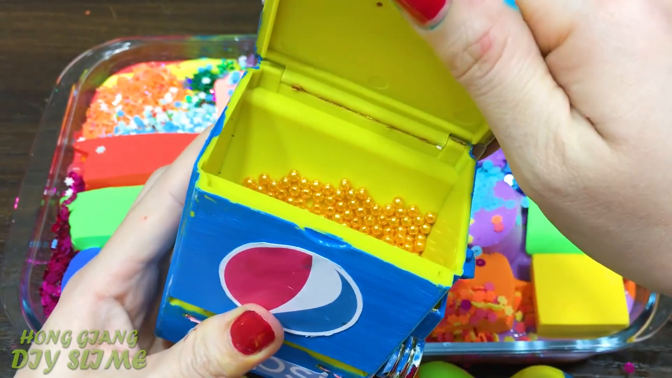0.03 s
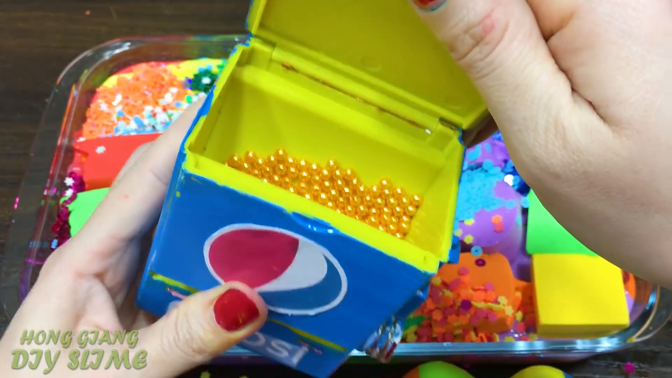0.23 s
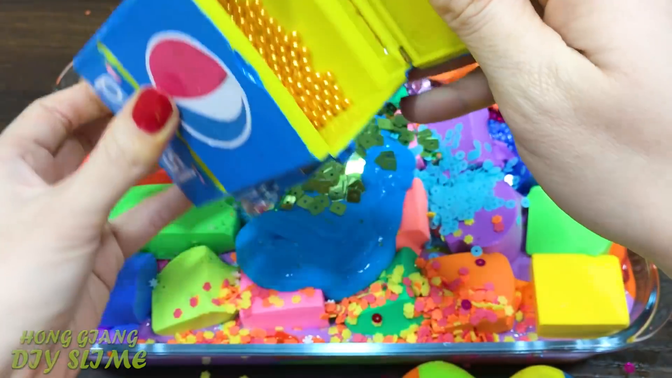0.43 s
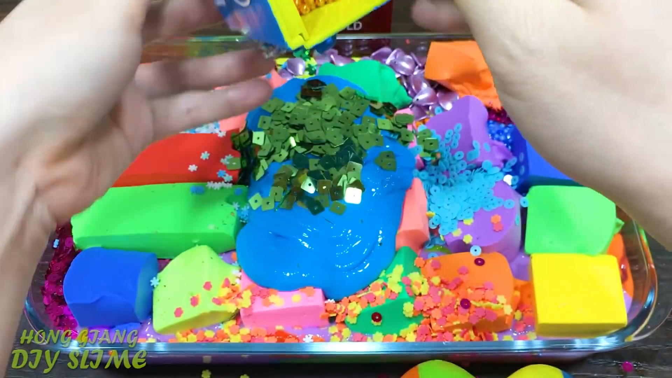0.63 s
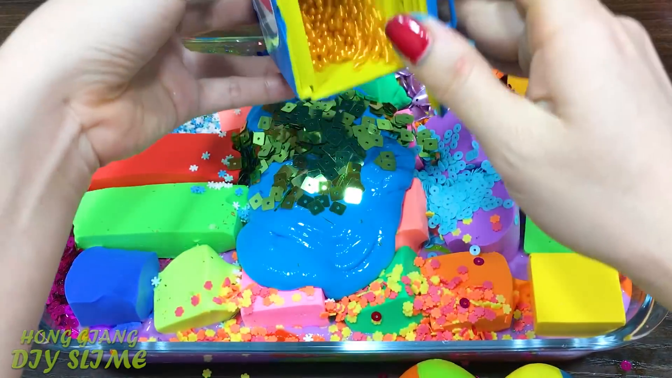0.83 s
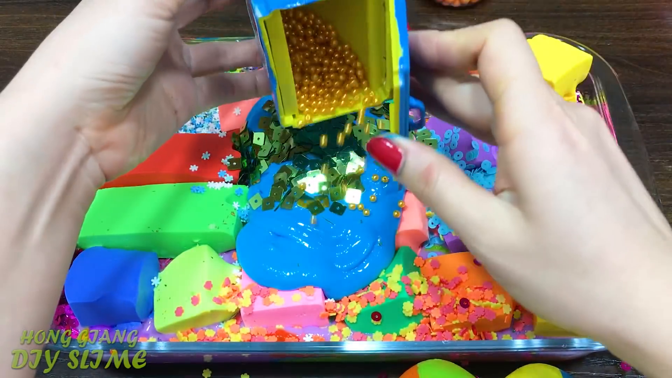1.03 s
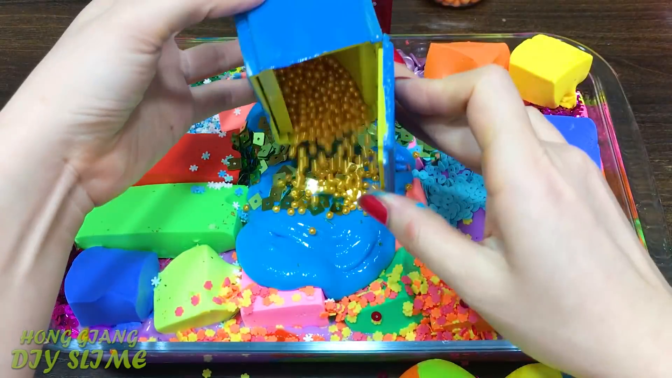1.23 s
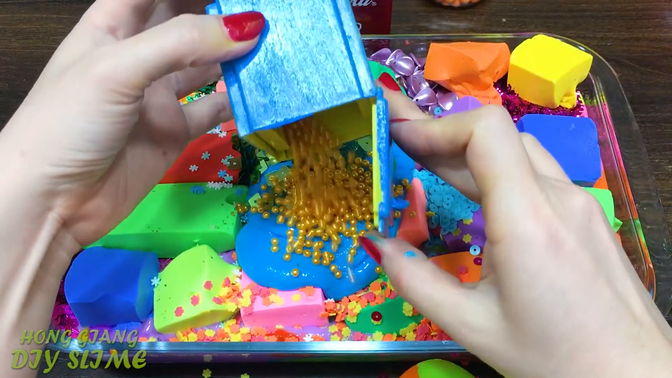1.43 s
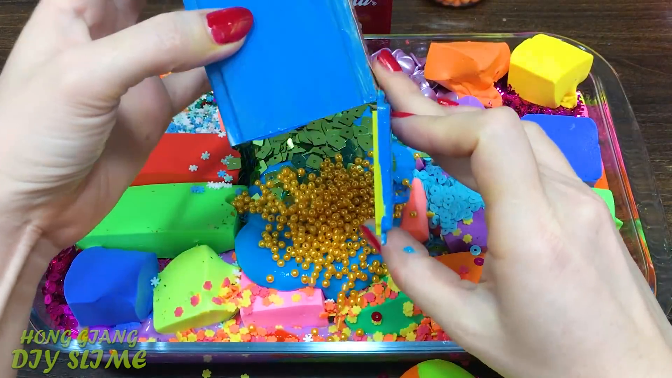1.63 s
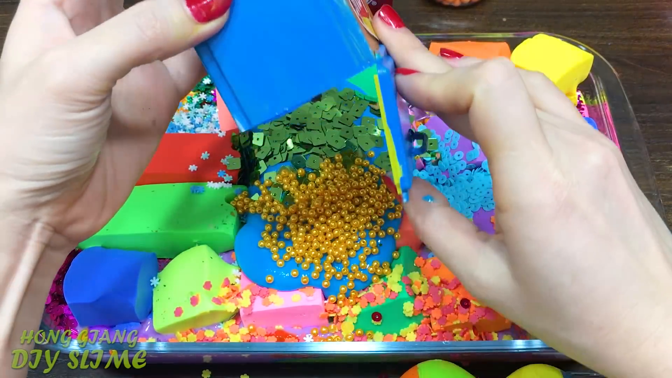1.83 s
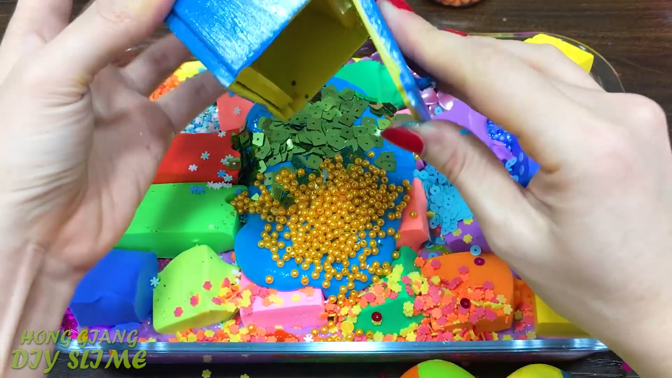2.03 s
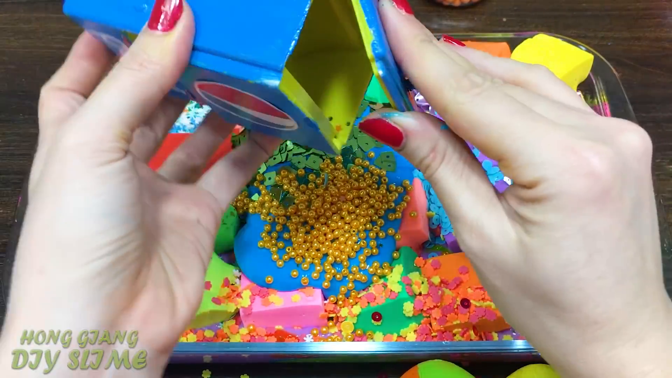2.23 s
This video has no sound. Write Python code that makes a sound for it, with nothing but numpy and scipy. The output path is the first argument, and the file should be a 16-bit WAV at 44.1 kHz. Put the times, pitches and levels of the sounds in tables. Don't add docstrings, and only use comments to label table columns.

```python
import sys
import numpy as np
from scipy import signal
from scipy.fft import rfft, irfft
from scipy.io import wavfile
from scipy.ndimage import uniform_filter1d

SR = 44100
rng = np.random.default_rng(int(sys.argv[2]) if len(sys.argv) > 2 else 0)


def invert_db(x):
    u = np.asarray(x, float) / 20
    return 10 ** u


def digitize_waveform(pressure):
    field = np.atleast_2d(pressure).T
    bounded = np.clip(field, -1, 1)
    quanta = np.round(bounded * 32767).astype(np.int16)
    wavfile.write(sys.argv[1], SR, quanta)


N = 101430


def evened(x):
    return x / np.sqrt(np.mean(x ** 2) + 1e-20)


def coloured(x, points):
    f, db = np.transpose(points)
    hz = np.fft.rfftfreq(len(x), 1 / SR)
    return irfft(rfft(x) * invert_db(np.interp(np.log(hz + 1), np.log(f), db)), len(x))


def highpassed(x, hz):
    return signal.sosfilt(signal.butter(4, hz, "high", fs=SR, output="sos"), x)


def ramp(t, start_s, end_s):
    return np.clip((t - start_s) / (end_s - start_s), 0, 1)


def drift(size):
    return evened(uniform_filter1d(uniform_filter1d(rng.standard_normal(N), size), size))


def add(mix, s, sound):
    part = mix[round(s * SR):][:len(sound)]
    part += sound[:len(part)]


def resonate(x, peaks):
    out = np.zeros(len(x))
    for hz, width, db in peaks:
        r = np.exp(-np.pi * width / SR)
        out += invert_db(db) * signal.lfilter([1 - r, 0, r - 1], [1, -2 * r * np.cos(2 * np.pi * hz / SR), r * r], x)
    return out


def ring(modes, rise=.01, size=4000):
    t = np.arange(size) / SR
    x = np.zeros(size)
    for hz, t60, db in modes:
        build = (1 - np.exp(-t * hz / rise)) ** 2
        x += build * invert_db(db - 60 * t / t60) * np.sin(2 * np.pi * hz * t)
    return x / abs(x).max()


def pops(events, modes, rise):
    out = np.zeros(N)
    for s, db in events:
        add(out, s, -invert_db(db) * ring(modes, rise))
    return out


def puff(colour, t60_s, rise_s):
    t = np.arange(900) / SR
    x = coloured(rng.standard_normal(900), colour) * invert_db(-60 * t / t60_s) * np.minimum(t / rise_s, 1)
    return x / abs(x).max()


def grains(rate_per_s, count=40):
    size_db, t60_s, top_hz = 3.4, .005, 16500
    u, kind, t = rng.random(N), rng.integers(0, count, N), np.arange(400) / SR
    struck = u < rate_per_s / SR
    size = invert_db(size_db * np.minimum(rng.exponential(1, N), 4.5)) * struck / np.sqrt(rate_per_s)
    shape, out = rng.random((count, 10, 2)), np.zeros(N)
    for k in range(count):
        hz, phase = top_hz * shape[k, :, :1], shape[k, :, 1:]
        tap = np.sin(2 * np.pi * (hz * t + phase)).sum(0)
        out += signal.oaconvolve(size * (kind == k), tap * invert_db(-60 * t / t60_s))[:N]
    return evened(out)


# (frequency [Hz], level [dB])
AIR_COLOUR = [(20, -33), (45, -11), (65, -8.5), (105, -2), (170, -6), (300, -9.5), (800, -18.5),
              (16000, -31)]


def air():
    air_db, hum_db, rumble_db, lump_db = -64, -72.5, -70.5, 0.5
    hum = resonate(rng.standard_normal(N), [(203.5, 8, 0)])
    low = [(70, 18, 0)]
    lumps = drift(4000)
    rumble = evened(invert_db(lump_db * lumps) * resonate(resonate(rng.standard_normal(N), low), low))
    tone = evened(coloured(rng.standard_normal(N), AIR_COLOUR))
    return invert_db(air_db) * tone + invert_db(hum_db) * evened(hum) + invert_db(rumble_db) * rumble


def room(x):
    low_t60_s, top_t60_s, spacing = 0.2, .13, 20
    t, taps = np.arange(SR // 2) / SR, np.zeros(SR // 2)
    at = np.arange(100, SR // 2 - spacing, spacing)
    taps[at + rng.integers(0, spacing, len(at))] = rng.choice([-1., 1.], len(at))
    low = uniform_filter1d(taps, 9)
    tail = low * invert_db(-60 * t / low_t60_s) + (taps - low) * invert_db(-60 * t / top_t60_s)
    return signal.fftconvolve(x, tail / np.linalg.norm(tail))[:N]


# (time [s], length [s], level [dB], tilt [dB/octave])
GRIPS = [
    (.835, .028, -46, 0),
    (2.02, .32, -61, -3.5),
    (1.08, .4, -64, 3),
    (1.88, .3, -67, 6),
]
# (frequency [Hz], level [dB])
GRIP_COLOUR = [(25, -30), (60, -3), (120, 0), (400, -7), (800, -14), (1500, -15), (3300, -20), (6000, -30)]


def grip():
    out = np.zeros(N)
    for s, length_s, db, tilt_db in GRIPS:
        size = round(length_s * SR)
        colour = [(hz, a_db + tilt_db * np.log2(hz / 100)) for hz, a_db in GRIP_COLOUR]
        rub = evened(coloured(rng.standard_normal(32768), colour))[:size]
        add(out, s, invert_db(db) * np.hanning(size) * rub)
    return out


# (time [s], length [s], level [dB])
SHIFTS = [
    (1.109, 0.34, -55),
    (2.045, 0.25, -65),
]
# (frequency [Hz], level [dB])
SHIFT_COLOUR = [(400, -32), (700, -16), (1300, -2.5), (1700, -4), (2500, -6), (16000, -58)]


def shift():
    t = np.arange(N) / SR
    swell = np.zeros(N)
    for s, length_s, db in SHIFTS:
        swell += invert_db(db) * np.sin(np.pi * ramp(t, s, s + length_s)) ** 0.72
    return swell * evened(coloured(grains(np.full(N, 1500.)), SHIFT_COLOUR))


# (time [s], peak [dB])
SQUEAKS = [
    (0.6446, -45),
    (0.6489, -44.5),
    (0.6544, -39.5),
]
# (frequency [Hz], t60 [s], level [dB])
SQUEAK_MODES = [(2250, 0.0027, 26), (1498, 0.0038, -19)]


def squeaks():
    return pops(SQUEAKS, SQUEAK_MODES, rise=0.9)


# (time [s], peak [dB])
TAPS = [
    (1.6412, -22),
]
# (frequency [Hz], t60 [s], level [dB])
TAP_MODES = [(1354, 0.0094, 7), (2870, 0.012, -2.5), (4090, 0.0075, -12)]


def taps():
    return pops(TAPS, TAP_MODES, rise=3.)


# (time [s], peak [dB])
KNOCKS = [(.004, -42.5), (.027, -50), (.058, -30.5), (1.0746, -60), (0.8395, -32), (1.166, -33),
          (1.2275, -36), (1.6405, -15), (2.139, -27), (2.2021, -43.5), (2.209, -46), (2.253, -40),
          (2.2915, -41), (2.2985, -40)]
# (frequency [Hz], level [dB])
KNOCK_COLOUR = [(500, -41), (1400, -8.5), (2500, -5), (4300, -2.5), (6000, -10), (8500, -3), (12000, -6.5),
                (16000, -11.5)]


def knocks():
    out = np.zeros(N)
    for s, db in KNOCKS:
        add(out, s, invert_db(db) * puff(KNOCK_COLOUR, t60_s=.012, rise_s=.0005))
    return out


# (time [s], peak [dB])
SLIPS = [
    (.0262, -54),
    (.0423, -24),
    (.125, -27),
    (.1693, -30.5),
    (.2034, -26),
    (.151, -55),
    (.158, -50.5),
    (.1615, -46),
    (.167, -45),
]
# (frequency [Hz], t60 [s], level [dB])
LID_MODES = [(1260, 0.004, 6.5), (603, 0.008, 1.5), (2620, 0.005, -12), (4700, .002, -18)]


def slips():
    return pops(SLIPS, LID_MODES, rise=0.98)


# (time [s], peak [dB], crack [dB], burst [s], tilt [dB/octave])
SNAPS = [
    (0.2209, -4.5, 1.5, 0.0012, 1.5),
    (0.2592, 3, -10, 0.0024, 4),
    (0.276, -24.5, -1, 0.0027, 6),
]
# (frequency [Hz], t60 [s], level [dB])
BODY_MODES = [(675, 0.0095, 3.5), (1359, 0.016, 5), (2083, 0.02, -11.5), (2586, 0.012, -4.5),
              (3680, .007, -8.5), (357, .1, -34), (617, 0.037, -20.5), (4850, 0.015, -17), (1555, 0.03, -6),
              (2890, .012, -13.5), (484, .01, -10), (745, .02, -17.5)]
# (frequency [Hz], width [Hz])
HOLLOWS = [(1000, 210), (1870, 200)]


def snaps():
    out, t = np.zeros(N), np.arange(600) / SR
    for s, db, crack_db, burst_s, tilt_db in SNAPS:
        drive = rng.standard_normal((2, 600)) * t / burst_s * np.exp(-t / burst_s * 2)
        modes = [(hz, t60, a_db + tilt_db * np.log2(hz / 1000)) for hz, t60, a_db in BODY_MODES]
        body = np.convolve(drive[0], ring(modes))
        crack = np.diff(drive[1])
        add(out, s, invert_db(db) * body / abs(body).max())
        add(out, s, invert_db(db + crack_db) * crack / abs(crack).max())
    for hz, width in HOLLOWS:
        out = signal.lfilter(*signal.iirnotch(hz, hz / width, SR), out)
    return out


# (time [s], level [dB], settling [dB/s])
JUMPS = [
    (.211, -66, 68.5),
    (1.065, -66.5, 250),
    (0.22, -29, 490),
    (.263, -17, 248),
    (0.836, -43.5, 303),
    (0.848, -71, 900),
    (.862, -66, 115),
    (0.924, -53.5, 360),
]
# (frequency [Hz], level [dB])
JUMP_COLOUR = [(200, -23.5), (450, -5.5), (950, -23.5), (1400, -7), (2100, -9.5), (4300, -8.5), (8700, 0),
               (16000, -5.5)]
# (frequency [Hz], width [Hz], level [dB])
JUMP_RING = [(355, 27, -10), (596, 60, -10), (2085, 140, 3.5), (1400, 250, -6.5), (3230, 450, -8.5)]


def jumps():
    rise_s, max_per_s, wall_db = .004, 5000, -11
    t = np.arange(N) / SR
    level = np.zeros(N)
    for s, db, fall_db_per_s in JUMPS:
        level += ramp(t, s, s + rise_s) * invert_db(db - fall_db_per_s * abs(t - s))
    x = grains(np.clip(max_per_s * level / invert_db(-30), 2500, max_per_s))
    beads = evened(coloured(x, JUMP_COLOUR))
    wall = evened(resonate(x + rng.standard_normal(N), JUMP_RING))
    return level * (beads + invert_db(wall_db) * wall)


# (time [s], peak [dB], pitch [Hz])
TICKS = [(0.0045, -46, 5700), (0.369, -22.5, 10900), (0.4034, -53, 6860), (0.4323, -60.5, 6800),
         (0.774, -33.5, 8650), (0.823, -35.5, 7720), (0.8479, -29, 8800), (0.873, -31, 6380),
         (0.9033, -31.5, 6400), (0.9187, -34.5, 6400), (0.9304, -48, 6360), (0.935, -49, 7340),
         (0.9396, -55, 7590), (1.1246, -30.5, 9000), (1.135, -40, 8000), (1.1385, -36, 10800),
         (1.1462, -47, 9110), (1.1558, -53, 11700), (1.1651, -31, 6440), (1.1751, -29.5, 7360),
         (1.195, -30, 9500), (1.2063, -29, 12300), (1.2292, -31.5, 5230), (1.2418, -32, 9000),
              (1.247, -26, 9800), (1.2587, -21.5, 8360), (1.2978, -19, 12600), (1.4519, -12.5, 8500),
              (2.114, -32, 10800), (2.1203, -27.5, 11400), (2.1557, -30, 12250), (2.1666, -27, 12600),
              (2.174, -38, 12500), (2.2253, -42, 14000), (2.245, -48, 12450), (2.2725, -55, 11500),
              (2.2775, -51.5, 11100),
         (1.3318, -15, 8520), (1.3465, -14, 12800), (1.3815, -15, 8160), (1.4265, -17, 8500),
              (1.4345, -16, 8500), (1.4935, -18, 8400), (1.5065, -18, 8500), (1.5172, -16, 12500),
              (1.6375, -19, 11500), (1.845, -20, 11600), (1.6654, -22, 6500), (1.6798, -22, 6700),
              (1.7362, -20, 11000), (1.8586, -21, 10800), (1.9346, -22, 9200), (2.0655, -24, 10800),
              (2.1005, -27, 10800)]
# (frequency [Hz], level [dB])
TICK_COLOUR = [(800, -50), (2000, -26), (4500, -16), (6500, 0), (11500, -1), (16000, -5)]
# (frequency [Hz], width [Hz], level [dB])
WALL = [(2110, 200, 2), (3250, 400, -4)]


def ticks():
    tipped_s, ring_db, ring_t60_s, gain_db, wall_db = .8, -1.5, .007, 4, 19.5
    out, t = np.zeros(N), np.arange(900) / SR
    for s, db, hz in TICKS:
        tone = invert_db(ring_db - 60 * t / ring_t60_s) * np.sin(2 * np.pi * hz * t) * np.minimum(t / .0004, 1)
        add(out, s, invert_db(db + gain_db) * (puff(TICK_COLOUR, t60_s=.011, rise_s=.0003) + tone) / 2)
    tipped = np.arange(N) > tipped_s * SR
    return out + invert_db(wall_db) * resonate(out * tipped, WALL)


# (time [s], flow [dB], wall contact [dB], pile ring [dB])
FLOW = [(1.06, -68, -1.5, -25), (1.12, -64.5, -1, -21), (1.141, -53, 4.5, -22), (1.223, -45, -3.5, 7),
        (1.279, -33.5, -5, 4.5), (1.347, -25, -12.5, -16), (1.43, -24, -12.5, -12.5),
        (1.528, -25.5, -9.5, -6.5), (1.59, -27.5, -7, -13.5), (1.72, -28.5, -4, -14),
        (1.85, -27, -2.5, -33), (1.99, -28, -0.5, -10), (2.065, -34.5, 0.5, -23), (2.102, -38.5, 0.5, -27),
        (2.128, -44.5, -10, -20), (2.178, -49.5, -17, -22), (2.22, -61, -1.5, -17), (2.3, -61.5, -8, -19)]
# (frequency [Hz], level [dB])
PATTER_COLOUR = [(300, -75), (700, -28.5), (1200, -24), (1700, -12.5), (3000, -12.5), (5700, -9.5),
                 (9000, -4.5), (16000, -3)]
# (frequency [Hz], width [Hz], level [dB])
BARE_WALL = [(2127, 62, 0), (2066, 88, -6.5), (1970, 44, -20.5), (2970, 1060, -15), (3760, 125, -8),
             (4060, 246, -5.5), (4690, 97, -5.5), (6585, 100, -4.5), (10800, 330, -6), (11500, 120, -2.5),
             (12500, 220, -21), (9000, 400, -8.5)]
# (frequency [Hz], width [Hz], level [dB])
CHIME = [(8480, 350, -3), (7860, 150, -8)]
# (frequency [Hz], width [Hz], level [dB])
PILE = [(8860, 170, -8.5), (1356, 150, -10), (4110, 190, -0.5)]


def pour():
    land_per_s, slide_per_s, clump_db, hiss = 7500, 9000, .9, .9
    t = np.arange(N) / SR
    s, flow_db, wall_db, pile_db = np.transpose(FLOW)
    level = invert_db(np.interp(t, s, flow_db, left=-120) + clump_db * drift(300))
    landing = level * grains(np.clip(land_per_s * level / invert_db(-40.5), 1000, land_per_s))

    contacts = grains(np.clip(slide_per_s * level / invert_db(-41.5), 2500, slide_per_s))
    slide = level * (contacts * .7 + hiss * rng.standard_normal(N)) * invert_db(np.interp(t, s, wall_db))
    empty = ramp(t, 1.3, 1.7)
    drum_modes = 3
    freed = invert_db(np.interp(t, [1.87, 2.07], [0, 4.5]))
    wall = resonate(slide * (1 - empty), WALL) + resonate(slide * empty, BARE_WALL[drum_modes:])
    wall += resonate(slide * empty * freed, BARE_WALL[:drum_modes])
    wall = highpassed(wall, 1750)

    exposed = np.sqrt(abs(np.sin(np.pi * ramp(t, 1.35, 1.57))))
    chime = resonate(landing * exposed, CHIME)
    pile = resonate(landing * ramp(t, 1.26, 1.38) * invert_db(np.interp(t, s, pile_db)), PILE)
    return invert_db(4.0) * coloured(landing, PATTER_COLOUR) + invert_db(9.5) * (wall + chime + pile)


def scene():
    handled = slips() + squeaks() + taps() + snaps()
    box = handled + ticks() + jumps() + pour() + knocks() + shift()
    near = highpassed(box, 312) + grip()
    return (near + invert_db(-15.5) * room(near) + air())[None]


def roll_off(x):
    return signal.sosfilt(signal.butter(12, 17080, fs=SR, output="sos"), x)


def record(dry):
    lowpass = signal.firwin(401, 15800, window=("kaiser", 5), fs=SR)
    mix = signal.oaconvolve(np.clip(dry, -1, 1), lowpass[None], "same")
    return roll_off(mix)


dry = scene()
out = record(dry)
digitize_waveform(out)
```